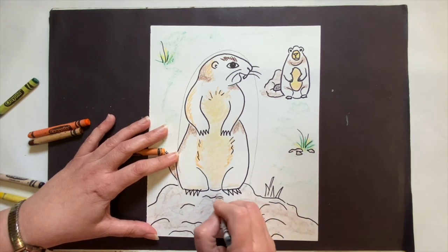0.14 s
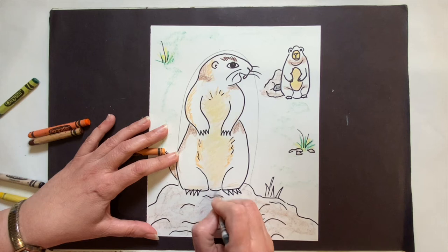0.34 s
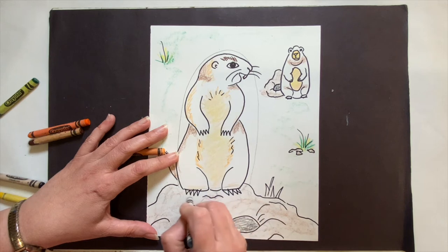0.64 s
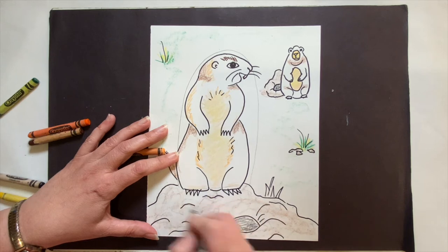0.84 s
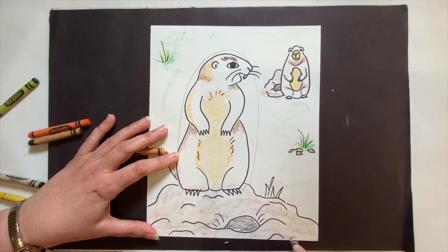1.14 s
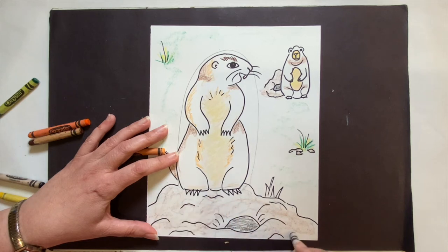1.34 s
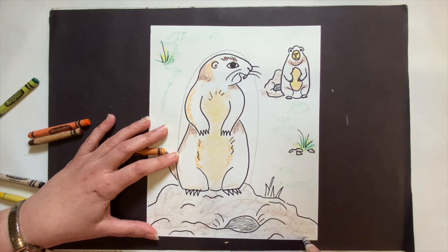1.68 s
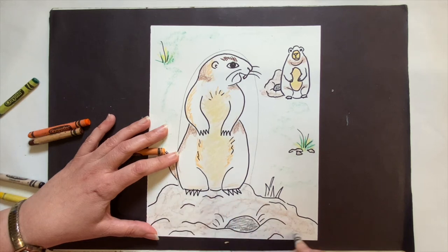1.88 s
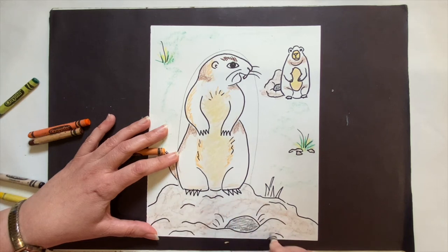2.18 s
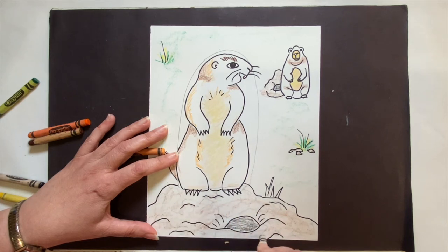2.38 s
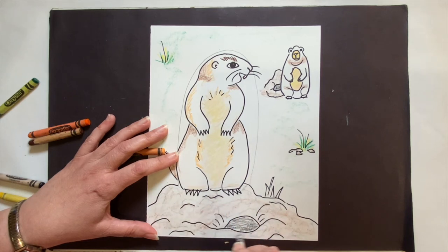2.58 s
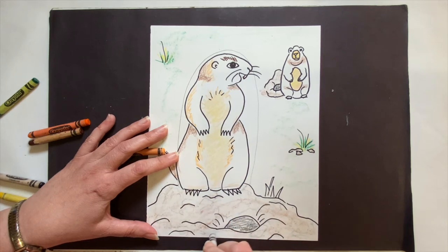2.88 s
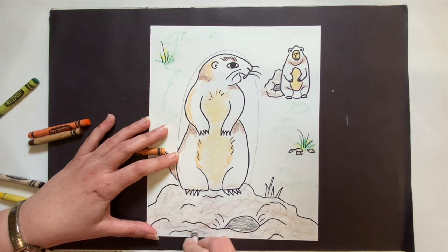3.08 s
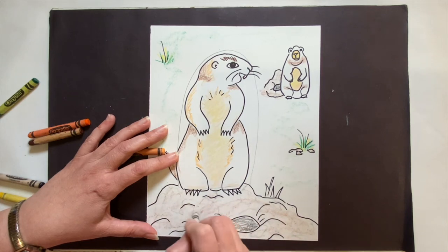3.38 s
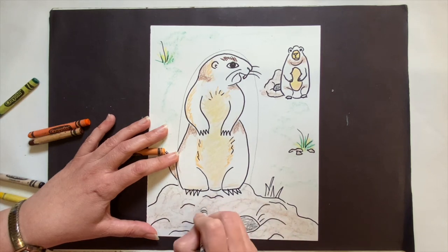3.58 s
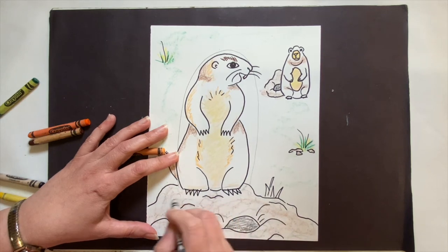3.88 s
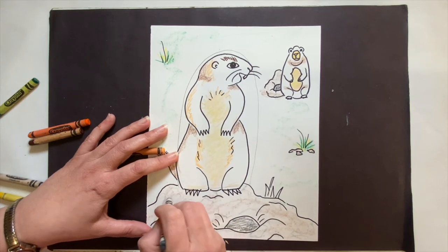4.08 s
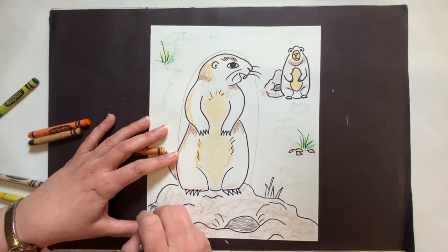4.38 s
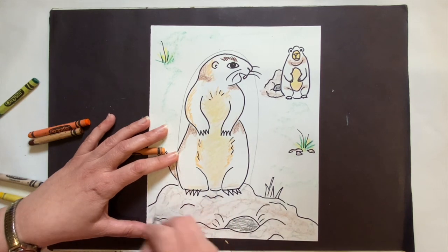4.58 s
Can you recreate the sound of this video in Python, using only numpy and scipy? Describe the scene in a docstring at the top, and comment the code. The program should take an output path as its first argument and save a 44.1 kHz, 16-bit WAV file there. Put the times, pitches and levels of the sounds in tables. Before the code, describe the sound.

A wax crayon rubs paper in quick dry strokes, about six in the first second, pausing for roughly four tenths of a second, then continuing unevenly to the end. Dull low bumps of hand and crayon pass through the desk, strongest early on. Small ticks and scuffs fall between strokes, and one sharp crayon click comes near four seconds. Quiet small room, close mono microphone on the desk.

```python
"""Quiet room, desk with a mat: a wax crayon is scribbled to and fro on a sheet of drawing paper.
Strokes are random fibre slips, coloured as rasp and edge hiss of the tip, drumming mat and rumbling desk.
Landings ring the desk's modes, with noise bursts for the thud and the slap of the paper.
Short band-noise flurries give ticks, squeaks, scuffs, rustles and light touches; one tap rings the crayon.
Beneath lie low swaying noise of the desk, room hush and a faint treble buzz."""
import sys
import numpy as np
from scipy import signal
from scipy.fft import rfft, irfft, next_fast_len
from scipy.io import wavfile

SR = 44100
rng = np.random.default_rng(int(sys.argv[2]) if len(sys.argv) > 2 else 0)


def transcribe(u):
    """Save the signal u as a 16-bit wav file named by the first command-line argument.

    u: samples, shape (n,) or (channels, n), limited to [-1, 1]; the rate is SR.
    q: integer samples, one column per channel.
    """
    v = np.clip(np.atleast_2d(u).T, -1, 1)
    q = np.round(v * 32767).astype(np.int16)
    wavfile.write(sys.argv[1], SR, q)


N = 208989

# desk swaying under the arm, level before trim: (time [s], level [dB])
SWAY_LEVEL = [(0.0, -32.5), (0.09, -59), (0.14, -35.5), (1.21, -47.5), (1.73, -42.5), (1.86, -28.5),
              (2.01, -33.5), (2.12, -30.5), (2.41, -34), (2.6, -35.5), (2.94, -41), (2.98, -36.5),
              (4.58, -47), (4.74, -55)]
SWAY_TRIM_DB = 3.5
# spectrum of the sway: (frequency [Hz], density [dB per Hz])
SWAY_SPECTRUM = [(10, 11.5), (13, 7), (18, -6), (28, -21), (44, -19), (62, -24.5), (90, -43.5)]
# spectrum of the room's hush: (frequency [Hz], density [dB per Hz])
HUSH_SPECTRUM = [(80, 27.5), (150, 16.5), (300, 13.5), (450, 9), (830, 9), (1100, 3), (2700, 2), (3800, 5),
                 (5000, 2.5), (9000, 0), (15500, 0.5)]
HUSH_DB = -69.5
# spectrum of the electrical buzz: (frequency [Hz], density [dB per Hz])
BUZZ_SPECTRUM = [(11500, -20), (13500, -2), (14200, -9), (15000, -5), (15600, -11)]
BUZZ_HZ, BUZZ_DB = 119.83, -86

# crayon strokes: (start [s], length [s], fastest point [share of length], rasp [dB], brightness [dB],
# then relative to the rasp: edge hiss [dB], mat drumming [dB], desk rumble [dB])
STROKES_TABLE = [(0.042, 0.18, 0.44, -66, -6.5, -8, -3.5, 1.5), (0.195, 0.12, 0.48, -67, -9, -10, 1, -3),
                 (0.317, 0.15, 0.6, -65, -5, -6.5, -8, 1), (0.446, 0.18, 0.15, -72, 0, -10, -6, -10),
                 (0.57, 0.19, 0.4, -72, 2, -9, 1.5, 8), (0.739, 0.14, 0.27, -63.5, 1, -10, -13, -5),
                 (1.264, 0.12, 0.62, -65, 1.5, -12.5, -16, -5), (1.401, 0.075, .55, -72, -5, -12, -7, 2.5),
                 (1.461, 0.1, 0.36, -69.5, -7, -5, -6.5, 0), (1.554, 0.071, 0.54, -75.5, -10, -4, -14, 4),
                 (1.734, .24, 0.68, -64, -0.5, -10.5, -12.5, 1.5),
                 (2.002, .145, .65, -68.5, -2, -11, -18, -8), (2.134, 0.17, 0.58, -65.5, -3, -10, -11, -3),
                 (2.285, 0.13, 0.4, -69.5, -4, -10, -11, -1), (2.396, 0.16, 0.3, -68, 0.5, -8, -8, 2),
                 (2.535, 0.18, 0.39, -63, 4.5, -4, -33, -19), (2.677, 0.2, 0.85, -67.5, 1, -6, -12, -10),
                 (2.876, 0.071, 0.47, -66.5, 1, -13, -13, -2), (2.935, .19, 0.4, -64.5, 0.5, -6, 1, 1),
                 (3.13, 0.21, 0.5, -64.5, 5, -5, -39, -17), (3.284, .165, 0.6, -65.5, 1.5, -9, -1, -0.5),
                 (3.45, .15, 0.36, -66, -3.5, -6.5, -10.5, 3), (3.607, 0.14, 0.49, -67.5, -0.5, -11, 0, 5),
                 (3.754, 0.062, 0.55, -71.5, -2, -7, -20, -17), (3.888, .08, 0.07, -77.5, 3, 0, -7, -12),
                 (3.989, 0.18, 0.7, -64, 5, -24, -20, -14), (4.142, 0.13, 0.03, -70, 3, -10, -4.5, 2),
                 (4.24, 0.14, 0.4, -71, 3, -8, -9, -10), (4.445, 0.088, 0.62, -65, 1, -15, -9, 1),
                 (4.524, 0.077, .4, -65.5, 5, -15, -21, -19)]
PACE_POWER = 0.6    # speed is a half sine to this power; below 1 is flatter in mid-stroke
BEAR_DOWN_DB = 3.5  # rise of the drive to mat and desk from start to end of a stroke
# spectrum of the tip on the paper's tooth: (frequency [Hz], density [dB per Hz])
RASP_SPECTRUM = [(900, -7), (1400, -20), (2000, -8.5), (2500, -10.5), (2900, -5.5), (3300, -3.5),
                 (3750, -2.5), (4200, -2), (5200, -2), (6000, -5.5), (6800, -17.5), (9000, -19.5)]
# spectrum of the tip's edge: (frequency [Hz], density [dB per Hz])
EDGE_SPECTRUM = [(2500, -37), (4500, -23.5), (6300, 1), (7200, -0.5), (8200, -2.5), (9300, -6.5),
                 (11000, -3), (15500, -13)]
# spectrum of the drumming mat: (frequency [Hz], density [dB per Hz])
MAT_SPECTRUM = [(400, -13.5), (520, -5.5), (620, -3), (760, 2.5), (880, -13), (1050, -18.5), (1400, -19),
                (2200, -23.5)]
# spectrum of the rumbling desk: (frequency [Hz], density [dB per Hz])
RUMBLE_SPECTRUM = [(45, 0.5), (65, 5.5), (80, 11), (105, 4), (135, -5.5), (165, 0), (200, 5), (240, 6),
                   (300, 1), (380, -0.5), (460, -19), (700, -22)]
# resonances of the paper sheet: (frequency [Hz], width [Hz], lift [dB])
SHEET_MODES = [(3395, 150, 5.5), (3745, 210, 6.0), (4520, 130, 3.0), (6950, 90, 4.0), (7280, 90, 4.0)]

# small contact sounds of crayon and paper: (time [s], level [dB], centre [Hz], width [Hz], fall [s])
CONTACTS = [(.083, -59.5, 6640, 3500, 0.0021), (.089, -66, 2930, 1200, .005), (.248, -70, 1100, 1500, .003),
            (.463, -64, 1980, 350, 0.0053), (.477, -67, 1920, 420, 0.0079),
            (.623, -63.5, 7100, 3500, 0.0033), (.626, -59.5, 3860, 1500, 0.0045),
            (.974, -68, 2680, 354, 0.0033), (1.079, -61, 590, 490, 0.02), (1.09, -68, 3500, 1010, 0.0043),
            (1.177, -66.5, 520, 397, 0.012), (1.978, -60.5, 2520, 700, 0.0025),
            (2.061, -58.5, 6440, 2980, .009), (2.835, -66.5, 667, 220, 0.015),
            (2.898, -70, 7960, 7000, .005), (3.897, -71, 8360, 6050, 0.0047)]
CONTACT_RISE_SHARE = 0.53  # rise time as a share of the fall time

# crayon and hand landing, levels before trims: (time [s], thump [dB], contact hardness [dB], paper slap [dB])
LANDINGS = [(0.089, -36, -12, -55), (0.246, -54.5, -6, -65), (0.625, -33.5, -9.5, -56),
            (0.849, -63, -11, -63), (1.087, -66, 3, -55), (1.266, -37.5, -15.5, -52.5),
            (1.693, -40.5, -20, -67), (2.081, -39, -11, -62), (2.639, -74.5, 8, -65),
            (2.75, -54.5, -21, -84), (2.899, -48.5, -23, -67), (3.222, -50.5, -13.5, -86),
            (3.33, -39.5, -11.5, -85), (3.459, -63.5, -5, -67), (3.906, -61, -26, -76),
            (4.07, -55.5, -5, -59.5), (4.227, -77, 7, -68), (4.275, -57.5, -19, -84),
            (4.37, -60, -12, -64.5), (4.549, -66.5, -3, -68), (4.649, -67, -7, -72)]
# desk modes: (frequency [Hz], relative level [dB], t60 [s])
DESK_MODES = [(44.7, 5, 0.34), (57.7, -8, 0.42), (100.8, -5.5, 0.25), (125, -11, 0.23), (152, -8, 0.38),
              (199.2, -1, 0.1), (228, -7.5, 0.11), (298.3, -11, 0.078), (376, -21, 0.098),
              (444, -20, 0.043), (520, -23.5, 0.081), (619, -4.5, 0.046), (704, -14.5, 0.11),
              (724, -17.5, 0.12), (1100, -16, 0.093), (1334, -16, 0.043)]
# spectrum of the crowd of short-lived mat and paper modes: (frequency [Hz], density [dB per Hz])
THUD_SPECTRUM = [(160, 12), (260, 8), (400, 4.5), (480, 3.5), (640, -4), (800, 6), (950, -12), (1400, -28),
                 (1800, -31)]
# spectrum of the paper slap: (frequency [Hz], density [dB per Hz])
SLAP_SPECTRUM = [(700, 17), (1200, -2.5), (2000, 3), (3500, -6), (5500, -15), (9000, -45)]

# sharp click of the crayon: (time [s], level [dB])
CRAYON_TAPS = [(4.082, -44)]
# crayon modes: (frequency [Hz], relative level [dB], t60 [s])
CRAYON_MODES = [(1220, -0.5, 0.0066), (2110, -6.5, 0.03), (2630, 1.5, 0.011), (3380, 5.5, 0.013),
                (3920, 2.5, 0.011), (5150, -23, 0.009)]

CUTOFF_HZ = 15750


def from_db(db):
    """Decibels to gain."""
    return 10 ** (np.asarray(db) / 20)


def rms_one(x):
    """Scale to rms 1."""
    return x / np.sqrt(np.mean(x ** 2) + 1e-20)


def in_time(rows):
    """Each column of a curve at every sample."""
    time_s, *columns = np.transpose(rows)
    return [np.interp(np.arange(N) / SR, time_s, column) for column in columns]


def coloured(x, spectrum):
    """Shape an excitation to a spectrum falling 20 dB per octave beyond its ends; rms 1."""
    hz, db = np.transpose(spectrum)
    knots = np.log2(hz)
    size = next_fast_len(N)
    octave = np.log2(np.arange(size // 2 + 1) * SR / size + 1)
    beyond = np.abs(octave - np.clip(octave, knots[0], knots[-1]))
    gain = from_db(np.interp(octave, knots, db) - 20 * beyond)
    return rms_one(irfft(rfft(x, size) * gain, size)[:N])


def noise(spectrum):
    """Steady coloured noise; rms 1."""
    return coloured(rng.standard_normal(N), spectrum)


def drift(rate_hz):
    """Smooth random drift of rms 1: noise through a two-pole lowpass."""
    r = np.exp(-2 * np.pi * rate_hz / SR)
    settled = signal.lfilter([1], [1, -2 * r, r * r], rng.standard_normal(N + SR))[SR:]
    return rms_one(settled)


def ring(impulses, hz, t60_s):
    """Damped mode: a unit impulse starts a decaying sine of height 1."""
    r = from_db(-60 / (t60_s * SR))
    w = 2 * np.pi * hz / SR
    return signal.lfilter([0, np.sin(w)], [1, -2 * r * np.cos(w), r * r], impulses + 1e-18)


def strikes(times_s, db):
    """One impulse at each time."""
    out = np.zeros(N)
    out[np.round(np.asarray(times_s) * SR).astype(int)] = from_db(db)
    return out


def sway():
    """Very low noise of the desk swaying under the arm."""
    level_db, = in_time(SWAY_LEVEL)
    return from_db(level_db + SWAY_TRIM_DB) * noise(SWAY_SPECTRUM)


def hush():
    """Steady noise of the quiet room."""
    return from_db(HUSH_DB) * noise(HUSH_SPECTRUM)


def buzz():
    """Electrical buzz: one spike each half cycle of the mains, heard high in the treble."""
    period = round(SR / BUZZ_HZ)
    spikes = 1.0 * (np.arange(N) % period == 0)
    return from_db(BUZZ_DB) * coloured(spikes, BUZZ_SPECTRUM)


def hand():
    """Each stroke gathers speed and slows to its turn; returns speed and drive of tip, paper, mat, desk."""
    t = np.arange(N) / SR
    speed = np.full(N, 0.05)  # the tip never quite rests
    power = np.zeros((5, N))
    for start_s, length_s, fastest, db, bright_db, edge_db, mat_db, desk_db in STROKES_TABLE:
        now = (t > start_s) & (t < start_s + length_s)
        along = (t[now] - start_s) / length_s
        peak = np.clip(fastest, 0.1, 0.9)
        arc = np.interp(along, [0, peak, 1], [0, np.pi / 2, np.pi])
        pace = np.abs(np.sin(arc)) ** PACE_POWER
        press_db = BEAR_DOWN_DB * (along - 0.5)
        drive_db = np.broadcast_arrays(-bright_db / 2, bright_db / 2, edge_db,
                                       mat_db + press_db, desk_db + press_db)
        speed[now] = np.maximum(speed[now], pace)
        power[:, now] += (pace * from_db(db + np.array(drive_db))) ** 2
    return speed, np.sqrt(power)


def slips(per_s, spread_db):
    """Tiny slips of wax over paper fibres: random moments, signs and sizes, power evened over rate."""
    sizes = from_db(spread_db * np.minimum(rng.exponential(1, N), 4))
    happens = rng.random(N) < per_s / SR
    return happens * sizes * rng.choice([-1, 1], N) / np.sqrt(per_s)


def sheet(x):
    """The sheet's resonances stand out of the rubbing noise; rms 1."""
    out = x
    for hz, width_hz, lift_db in SHEET_MODES:
        b, a = signal.iirpeak(hz, hz / width_hz, fs=SR)
        out = out + (from_db(lift_db) - 1) * signal.lfilter(b, a, x)
    return rms_one(out)


def scribble(flutter_db=0.9, judder_db=3.0):
    """A faster stroke crosses more fibres; the coarser bumps push through to mat and desk."""
    speed, (on_lower, on_upper, on_edge, on_mat, on_desk) = hand()
    fibre_slips = slips(18000 * speed, spread_db=2.5) * from_db(flutter_db * drift(49))
    fibres = coloured(fibre_slips, RASP_SPECTRUM)
    # brightness tilts the rasp about 4100 Hz
    upper = signal.sosfiltfilt(signal.butter(4, 4100, "high", fs=SR, output="sos"), fibres)
    rasp = on_lower * (fibres - upper) + on_upper * upper
    paper = np.std(rasp) * sheet(rasp)
    edge = on_edge * sheet(coloured(slips(22000 * speed, spread_db=3.5), EDGE_SPECTRUM))
    bumps = slips(2400 * speed, spread_db=1.5) * from_db(judder_db * drift(66))
    mat = on_mat * coloured(bumps, MAT_SPECTRUM)
    desk = on_desk * coloured(bumps, RUMBLE_SPECTRUM)
    return paper + edge + mat + desk


def small_contacts():
    """Ticks, squeaks, scuffs, rustles and touches: short flurries of noise in a narrow or wide band."""
    out = np.zeros(N)
    t = np.arange(SR // 10) / SR
    for time_s, db, hz, width_hz, fall_s in CONTACTS:
        edges_hz = [max(hz - width_hz / 2, 100), min(hz + width_hz / 2, 0.45 * SR)]
        band = signal.butter(2, edges_hz, "band", fs=SR, output="sos")
        flurry = rms_one(signal.sosfilt(band, rng.standard_normal(len(t))))
        rise_s = CONTACT_RISE_SHARE * fall_s
        # rise, equal hold, exponential fall
        shape = np.minimum(t / rise_s, 1) * np.exp(-np.maximum(t - 2 * rise_s, 0) / fall_s)
        at = round(time_s * SR)
        out[at:at + len(t)] += from_db(db) * shape * flurry
    return out


def burst(impulses, fall_s, spectrum, rise_s=0.00087):
    """Noise that swells quickly at each impulse and dies away."""
    keep = np.exp(-1 / (rise_s * SR))
    dying = signal.lfilter([1], [1, -np.exp(-1 / (fall_s * SR))], impulses + 1e-18)
    envelope = signal.lfilter([1 - keep], [1, -keep], dying)
    return envelope * noise(spectrum)


def knocks(thump_trim_db=1.0, soft_db=-4.0, vary_db=1.8, contact_hz=1200, slap_trim_db=2.0,
           slap_fall_s=0.0067, thud_fall_s=0.021, low_centre_db=-41, low_evening_share=0.29):
    """Each landing rings the desk and slaps the sheet; a hard one lifts the upper modes and the thud."""
    times_s, level_db, hardness_db, paper_db = np.transpose(LANDINGS)
    # the blow reaches the microphone through its stand, then a little stronger through the air
    first_s, second_s, first_db = times_s + 0.0012, times_s + 0.0043, -3.0
    chance = rng.standard_normal((len(times_s), len(DESK_MODES)))
    wood = np.zeros(N)
    for k, (hz, mode_db, t60_s) in enumerate(DESK_MODES):
        upper, lower = np.clip([np.log2(hz / 320), np.log2(200 / hz)], 0, 1)
        blow_db = level_db + thump_trim_db + mode_db + vary_db * chance[:, k]
        blow_db = blow_db + upper * (hardness_db - soft_db)
        # low modes vary somewhat less from landing to landing than the rest
        blow_db = blow_db + lower * low_evening_share * (low_centre_db - level_db)
        blows = strikes(first_s, blow_db + first_db) + strikes(second_s, blow_db)
        wood += ring(blows, hz, t60_s)
    # wax and skin cushion the blow
    wood = signal.sosfilt(signal.butter(3, contact_hz, fs=SR, output="sos"), wood)
    thud = burst(strikes(second_s, level_db + hardness_db), thud_fall_s, THUD_SPECTRUM)
    slap = burst(strikes(first_s, paper_db + slap_trim_db), slap_fall_s, SLAP_SPECTRUM)
    return wood + thud + slap


def clicks():
    """The tapped stick rings briefly in its own modes, with alternating signs."""
    taps = strikes(*np.transpose(CRAYON_TAPS))
    out = np.zeros(N)
    for k, (hz, db, t60_s) in enumerate(CRAYON_MODES):
        out += (-1) ** k * from_db(db) * ring(taps, hz, t60_s)
    return out


def room(x, wet_db=-14.0, t60_s=0.14):
    """A small furnished room adds a short diffuse tail to the mids and the treble."""
    t = np.arange(SR // 3) / SR
    tail = rng.standard_normal(len(t)) * from_db(-60 * t / t60_s) * (t > 0.002)
    tail = tail / np.linalg.norm(tail)
    airborne = signal.sosfilt(signal.butter(2, 1200, "high", fs=SR, output="sos"), x)
    return x + from_db(wet_db) * signal.fftconvolve(airborne, tail)[:N]


def scene():
    """Strokes and contacts in the room, over sway, hush and buzz."""
    background = sway() + hush() + buzz()
    crayon = scribble() + small_contacts() + knocks() + clicks()
    return (background + room(crayon))[None]


def record(dry):
    """A steep elliptic lowpass cuts the top."""
    lowpass = signal.ellip(12, 0.1, 80, CUTOFF_HZ, fs=SR, output="sos")
    return signal.sosfilt(lowpass, dry)


dry = scene()
out = record(dry)
transcribe(out)
```